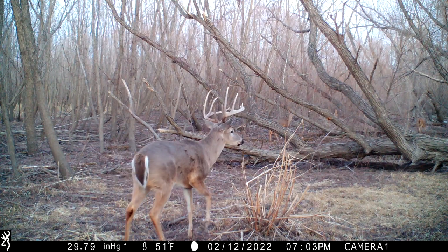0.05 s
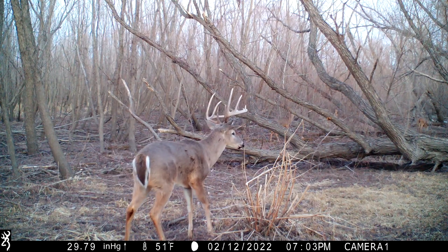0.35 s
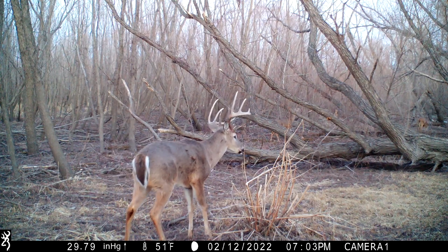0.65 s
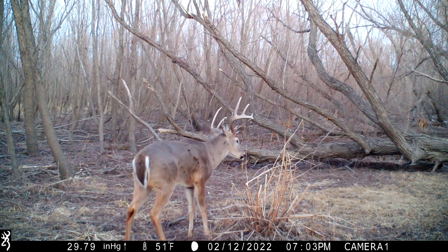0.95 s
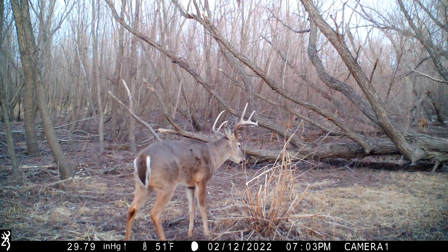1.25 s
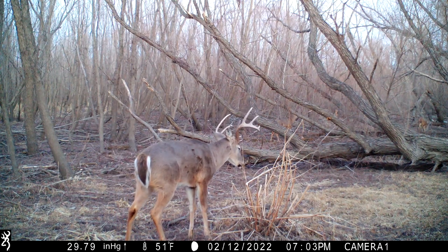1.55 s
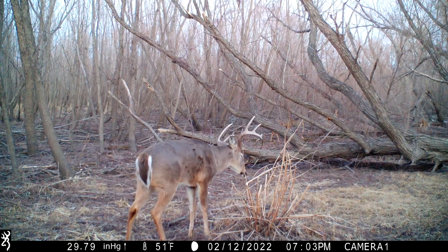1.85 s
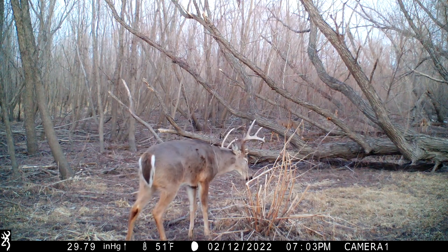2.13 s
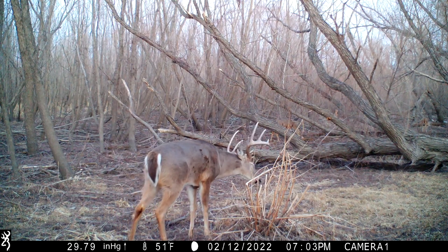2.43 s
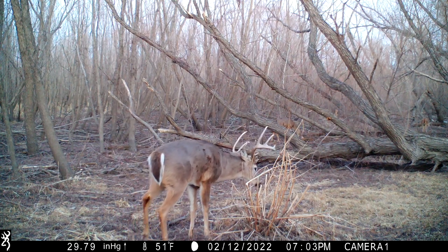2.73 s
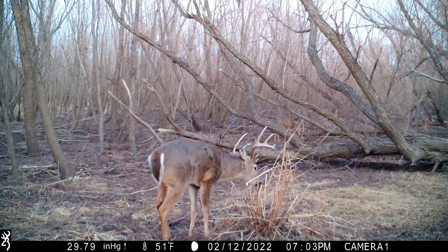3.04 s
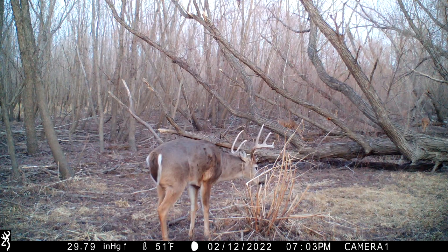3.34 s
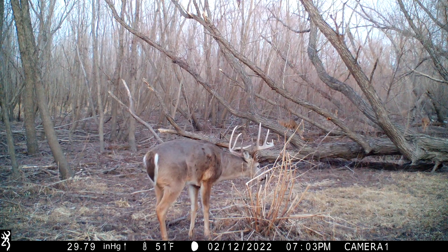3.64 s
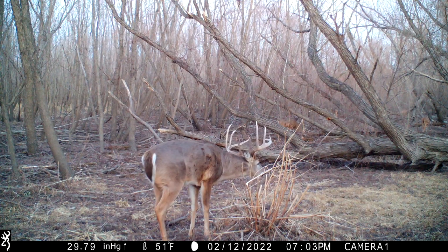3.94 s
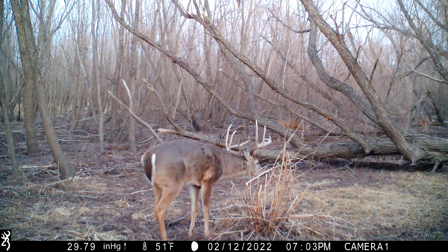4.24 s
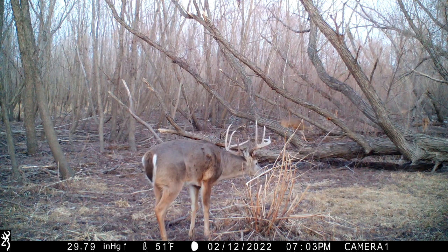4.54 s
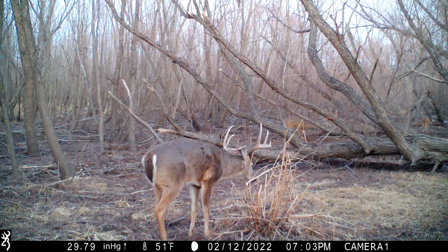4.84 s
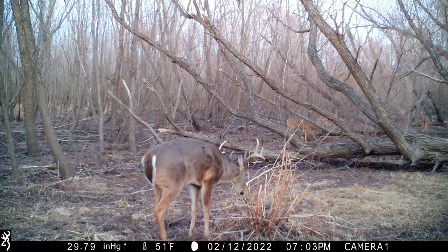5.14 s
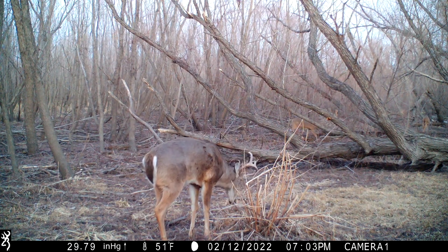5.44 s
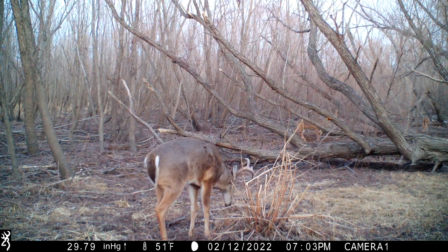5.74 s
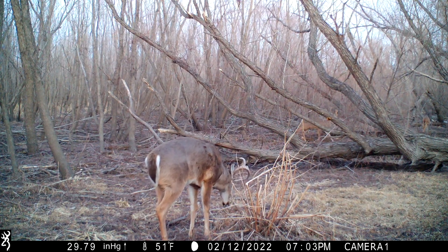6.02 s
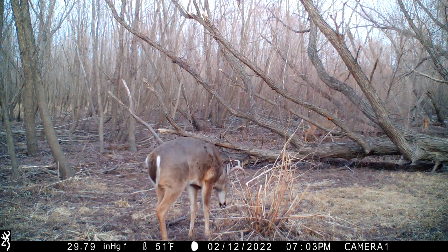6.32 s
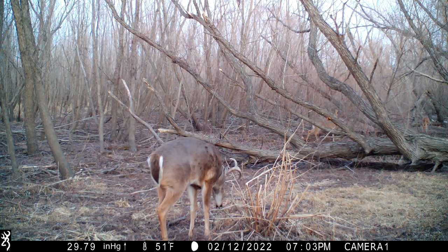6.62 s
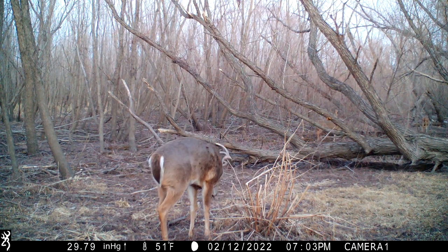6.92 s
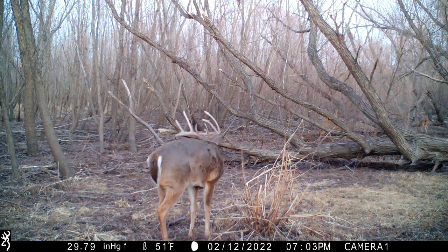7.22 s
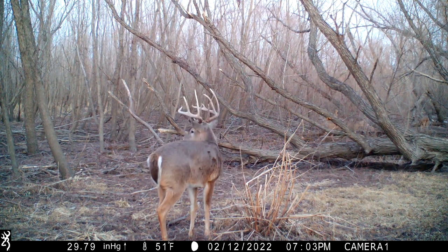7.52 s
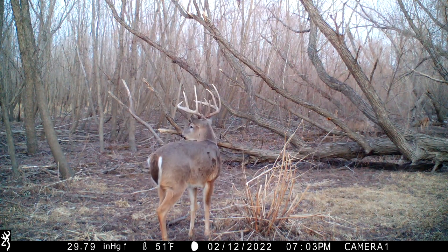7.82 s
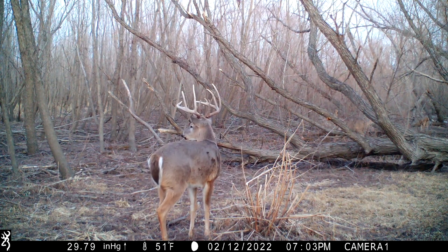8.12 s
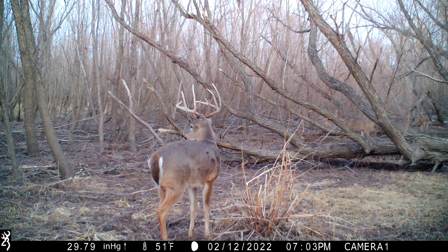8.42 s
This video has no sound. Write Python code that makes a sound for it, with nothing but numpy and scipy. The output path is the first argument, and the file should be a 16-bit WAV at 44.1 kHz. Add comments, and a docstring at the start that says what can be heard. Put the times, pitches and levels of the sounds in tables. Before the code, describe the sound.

A large flock of geese yelps and honks continuously beyond the trees while a nearby deer cracks twigs and brushes dry grass.

```python
"""Geese behind a bare wood

A trail camera's microphone picks up a big flock yelping without pause beyond a strip of trees.
The nearest birds stand out as short arched calls; hundreds more merge into a din that the trunks
scatter. Close by, a deer cracks twigs and brushes dry grass. Underneath lie a faint far-off drone,
still air, microphone hiss and the thin whine of the camera's electronics."""
import sys
import numpy as np
from scipy import signal
from scipy.fft import rfft, irfft, next_fast_len
from scipy.io import wavfile
from scipy.ndimage import uniform_filter1d

SR = 44100
rng = np.random.default_rng(int(sys.argv[2]) if len(sys.argv) > 2 else 0)


def output_pcm(signal):
    """Save a mono or channel-first signal as 16-bit PCM at the path in sys.argv[1].

    Samples are clipped to [-1, 1] before scaling.
    """
    pcm = np.clip(np.atleast_2d(signal).T, -1, 1) * 32767
    wavfile.write(sys.argv[1], SR, np.round(pcm).astype(np.int16))


N = 382347
TIME = np.arange(N) / SR

# treble lost between single geese and the microphone: frequency_hz, gain_db
TREBLE_LOSS = [(4900, -2), (5700, -1), (6400, -15.5), (7500, -30.5)]
DULLING_DB_PER_S = 0.71  # the overtones of the farther birds fade steadily
ROUGH_JITTER = .016  # shake of a rough voice's membranes, as a share of the pitch


def undb(db):
    """Decibels to gain."""
    return 10 ** (np.asarray(db) / 20)


def unit(x):
    """Scale to rms 1."""
    return x / np.sqrt(np.mean(x ** 2) + 1e-20)


def colour(x, points):
    """Filter a sound by a curve of (frequency_hz, gain_db) points."""
    size = next_fast_len(len(x))
    bin_hz = np.arange(size // 2 + 1) * SR / size
    point_hz, point_db = np.transpose(points)
    gain = undb(np.interp(np.log(bin_hz + 1), np.log(point_hz), point_db))
    return irfft(rfft(x, size) * gain, size)[:len(x)]


def add(out, start_s, x):
    """Mix a sound in at a time, dropping what falls outside."""
    i = int(start_s * SR)
    a, b = max(i, 0), min(i + len(x), len(out))
    if b > a:
        out[a:b] += x[a - i:b - i]


def wobble(t, rate_hz):
    """Random values joined by straight lines."""
    knots = np.arange(int(t[-1] * rate_hz) + 2)
    return np.interp(t * rate_hz, knots, rng.standard_normal(len(knots)))


def woods(x, wet_db, t60_s):
    """Direct sound plus a fading shower of echoes from the trunks."""
    t = TIME[:SR]
    echoes = rng.standard_normal(SR) ** 3 * undb(-60 * t / t60_s) * (t > .004)
    wet = undb(wet_db) * signal.fftconvolve(x, echoes / np.linalg.norm(echoes))[:N]
    return (x + wet) / np.sqrt(1 + undb(wet_db) ** 2)


def syrinx(length_s, top_hz, fall, jitter, rise=0.0862, bend=1.495, rise_s=0.0226, attack_s=0.0026):
    """Phase and envelope of a goose's voice: the pitch leaps up as pressure builds, then sags."""
    t = TIME[:int((length_s + .008) * SR)]
    # rise, fall and jitter are shares of the pitch; a higher bend holds the top longer
    leap = rise * np.clip(1 - t / rise_s, 0, 1) ** 2
    sag = fall * np.clip((t - rise_s) / max(length_s - rise_s, .01), 0, 1.2) ** bend
    hz = top_hz * (1 - leap - sag) * (1 + jitter * wobble(t, 500))
    swell = np.clip(t / attack_s, 0, 1) * np.clip((t[-1] - t) / 0.017, 0, 1)
    flutter = undb(1.8 * wobble(t, 120))
    return 2 * np.pi * np.cumsum(hz) / SR, swell * flutter


def yelp(length_s, hz, level_db, bright_db, sag, rough, break_step=.015, flutter_db=2.1):
    """One call, deep or shrill by its pitch, turning hoarse as the pressure runs out."""
    # harmonics 1, 2, .. of each kind of goose with its throat wide open: level_db
    deep_voice = [-4, 0.5, 1, -13, -17, -30]
    shrill_voice = [-2.5, -8.5, -2, -18.5]
    deep = hz < 1200
    rise, bend = (.17, 2.4) if deep else (.07, 1.3)
    phase, swell = syrinx(length_s, hz, sag, ROUGH_JITTER * rough, rise, bend)
    t = TIME[:len(phase)]
    # somewhere past the middle the voice breaks to a slightly different pitch
    break_s = length_s * (1 + rng.random()) / 2
    step_hz = hz * break_step * rough * rng.standard_normal()
    phase = phase + 2 * np.pi * step_hz * np.maximum(t - break_s, 0)
    harmonics_db = np.array(deep_voice if deep else shrill_voice)
    k = np.arange(1, len(harmonics_db) + 1)
    # distance and a narrower throat dull the upper harmonics; branches make each one flutter
    dulled = np.clip(k - 2 if deep else (k - 1) / 2, 0, 1)
    flutter = np.array([flutter_db * wobble(t, 110) for _ in k])
    gains = undb((harmonics_db + dulled * bright_db)[:, None] + flutter)
    hoarse = 1 + rough * (.5 + t / length_s) * wobble(t, 700)
    return undb(level_db) * swell * hoarse * np.sum(gains * np.sin(np.outer(k, phase)), axis=0)


def near_geese(gain_db=4.0, overtone_db=1.0, echo_db=-17):
    """Birds near the microphone, each call heard on its own and thrown back by two nearby trunks."""
    # calls that stand out of the chorus:
    # start_s, length_s, top_pitch_hz, relative_level_db, brightness_db, sag_share, roughness_0_to_1
    yelps = [(0.0, 0.034, 1564, -45, -11, 0.034, 0.3), (0.062, 0.065, 1396, -52, -8, 0.075, .4),
             (0.077, 0.057, 1486, -41, -12.5, 0.053, 0.83), (0.3, 0.065, 1540, -52, -5.5, 0.049, 1),
             (0.412, 0.11, 1514, -47, -8.5, 0.13, 0.63), (0.565, 0.066, 1566, -43, -13, 0.13, 0.65),
             (0.677, 0.11, 1492, -54.5, -6, 0.046, 0.36), (0.93, 0.038, 1516, -38.5, -24, 0.053, 0.04),
             (1.042, 0.065, 1570, -40.5, -36, 0.052, 0.85), (1.256, 0.072, 1497, -40.5, -27, 0.099, 0.97),
             (1.47, 0.094, 1440, -53, -2.5, 0.053, 0.5), (1.579, 0.018, 1334, -33.5, -29, 0.022, 0.05),
             (1.63, 0.062, 1570, -58, -1, 0.081, 0.1), (1.673, 0.069, 1075, -51.5, -24, 0.066, 0.5),
             (1.677, 0.055, 1434, -43.5, -13.5, 0.058, 0.34), (1.788, 0.09, 1540, -56, -4.5, 0.063, 0.3),
             (1.808, 0.05, 1105, -48.5, -24, .04, 0.45), (1.868, .045, 1517, -43.5, -20, 0.069, 0.9),
             (2.007, 0.054, 1455, -54, -7, .08, .3), (2.014, 0.083, 1670, -42.5, -27, 0.07, 0.97),
             (2.17, .11, 1365, -43, -12, 0.038, 0.55), (2.32, 0.049, 1320, -54, -5, .03, .3),
             (2.366, 0.043, 1525, -41, -18, 0.04, .4), (2.479, 0.082, 1560, -40.5, -21, 0.13, 0.15),
             (2.606, 0.1, 1623, -50.5, -6.5, 0.18, 0.15), (2.608, .05, 1490, -54, -6, 0.069, 0.2),
             (2.751, 0.06, 1547, -50.5, -7, 0.035, 0.4), (2.887, 0.068, 1404, -51.5, -7, 0.075, 0.6),
             (3.02, 0.077, 1446, -53, -11, 0.096, .4), (3.091, 0.04, 1700, -42, -36, 0.18, 0.9),
             (3.201, 0.07, 1003, -53, -24, 0.065, .6), (3.315, 0.055, 1310, -59, -8, 0.03, .3),
             (3.978, 0.056, 1536, -36.5, -26, 0.11, 0.25), (4.103, 0.036, 1565, -40, -28, 0.12, 0.65),
             (4.286, 0.064, 1480, -41.5, -17.5, 0.091, 0.4), (4.432, .07, 1357, -51.5, -9, .05, .6),
             (4.436, 0.091, 1515, -44, -19.5, 0.048, 0.63), (4.528, 0.044, 1589, -41, -22, 0.019, 0.45),
             (4.542, 0.12, 1587, -54, -2, 0.068, 0.1), (4.791, 0.074, 1580, -53.5, -5, .08, 0.2),
             (4.95, 0.031, 1363, -53, -4.5, .02, .2), (4.991, 0.047, 1465, -53.5, -7, 0.025, 0.2),
             (5.152, 0.05, 1490, -49, -27, 0.055, 0.2), (5.226, 0.075, 1045, -50.5, -13, 0.06, 0.1),
             (5.314, 0.06, 1033, -50, -21, 0.068, .15), (5.541, 0.052, 1460, -56, -8, 0.029, 0.15),
             (5.643, 0.039, 998, -45.5, -30, 0.05, 0.16), (5.696, 0.052, 1470, -51, -13, 0.049, 0.25),
             (5.783, .055, 1548, -54, -7, 0.07, 0.15), (5.858, .05, 1458, -54, -8, 0.05, 0.15),
             (6.237, 0.057, 1450, -41, -31, 0.035, 0.2), (6.404, 0.058, 1740, -45, -40, 0.074, 0.7),
             (6.49, 0.06, 1335, -55.5, -10, 0.018, 0.2), (6.578, 0.065, 1498, -46, -27, 0.044, 0.4),
             (6.927, 0.047, 1434, -39.5, -31, 0.034, 0.4), (7.044, 0.055, 1606, -41, -36, 0.093, 0.33),
             (7.181, 0.098, 1570, -44.5, -33, 0.15, 0.4), (7.298, 0.036, 1420, -44.5, -25, 0.055, .4),
             (7.405, .05, 1437, -56, -14, .06, 0.4), (7.474, 0.044, 978, -49, -29, .02, 0.4),
             (7.527, 0.098, 1035, -53, -26, 0.18, 0.8), (7.675, 0.052, 1071, -48.5, -22, 0.04, 0.2),
             (7.882, 0.1, 1350, -48, -27, 0.028, 0.15), (7.974, 0.075, 1455, -50, -24, 0.05, 0.15),
             (8.113, .075, 1551, -40.5, -28.5, 0.033, 0), (8.19, 0.075, 1512, -45, -27, 0.036, .15),
             (8.255, 0.08, 1680, -44, -37, 0.11, 0.2), (8.379, 0.055, 1590, -43, -27, 0.055, .2),
             (8.458, 0.063, 1020, -52, -29, 0.11, 0.2), (8.565, 0.053, 1590, -50, -41, 0.027, 0.4),
             (8.62, 0.037, 1036, -54, -18, 0.054, 0.5)]
    out = np.zeros(N)
    for start, length, hz, db, bright_db, sag, rough in yelps:
        call = yelp(length, hz, db, bright_db + overtone_db, sag, rough)
        add(out, start, call)
        for detour in rng.random(size=2):
            add(out, start + .045 * (0.18 + detour), undb(echo_db) * call)
    return undb(gain_db) * woods(colour(out, TREBLE_LOSS), wet_db=-15.0, t60_s=0.54)


def excitement_db(t, usual_db=-43):
    """How far the flock is above its usual level at these times."""
    # the flock's excitement: time_s, relative_level_db
    excitement = [(0.0, -43), (0.14, -41), (0.19, -40.5), (0.88, -42), (1.1, -40), (1.48, -43), (2.42, -39),
                  (2.78, -44), (2.94, -39.5), (3.97, -46), (4.0, -53.5), (4.07, -43), (4.58, -40),
                  (4.88, -44.5), (5.05, -40.5), (5.34, -45), (5.84, -40), (6.23, -49), (6.25, -53),
                  (6.3, -44), (7.11, -43), (7.83, -50.5), (8.09, -48.5), (8.12, -45.5), (8.58, -44.5),
                  (8.6, -48.5)]
    return np.interp(t, *np.transpose(excitement)) - usual_db


def answering(pitch_hz, level_db, bright_db, count, spread=0.061, scatter_db=0.5):
    """Birds take loose turns, louder when the flock is excited and duller as time goes on."""
    out = np.zeros(N)
    for turn, (late, detune, push, span) in enumerate(rng.standard_normal((count, 4))):
        start = (turn + .3 * late) / count * N / SR
        length_s = 0.055 * np.exp(.25 * span)
        hz = pitch_hz * np.exp(spread * detune)
        db = level_db + excitement_db(start) + scatter_db * push
        add(out, start, yelp(length_s, hz, db, bright_db - DULLING_DB_PER_S * start, sag=.09, rough=.4))
    return out


def flock_edge():
    """Geese at middle distance, just close enough to be told apart among the echoes of the wood."""
    shrill = answering(pitch_hz=1445, level_db=-52, bright_db=-10.5, count=48)
    deep = answering(pitch_hz=1039, level_db=-52, bright_db=-15, count=22)
    return woods(colour(shrill + deep, TREBLE_LOSS), wet_db=-7, t60_s=0.69)


def crowd(pitch_hz, spread, harmonics_db, count, depth_db=14, purity_db=7):
    """An even din: many birds of like size calling at random from different distances."""
    # colour of the massed voices on the microphone's side of the wood: frequency_hz, gain_db
    flock_colour = [(500, -29), (730, -13.5), (900, -1.5), (1150, 0), (1350, 5), (1700, -1), (2000, 0),
                    (2350, -7), (2900, -10.5), (3500, -20.5), (4500, -9), (5100, -13.5), (5700, -17.5),
                    (6800, -21.5)]
    out = np.zeros(N)
    k = np.arange(1, len(harmonics_db) + 1, dtype=np.float32)
    for when, span, droop, distance, detune in zip(*rng.random((4, count)), rng.standard_normal(count)):
        hz = pitch_hz * np.exp(spread * detune)
        phase, swell = syrinx(.045 + .05 * span, hz, fall=0.0289 + 0.1258 * droop, jitter=.016)
        # the higher a bird calls, the purer its voice
        gains = undb(harmonics_db) * undb(-purity_db * max(detune, 0) * (k > 2))
        voice = gains @ np.sin(np.outer(k, phase.astype(np.float32)))
        nearness = undb(-depth_db * np.sqrt(distance))  # few birds are close, most are far
        add(out, when * (N / SR + .1) - .1, nearness * swell * voice)
    din = colour(woods(out, wet_db=-6.0, t60_s=0.85), flock_colour)
    running_rms = np.sqrt(uniform_filter1d(din ** 2, SR // 10) + 1e-12)
    return din / running_rms


def flock(deep_db=-47.5, shrill_db=-45.0, overtone_db=2.5):
    """Beyond the trees the voices swell in waves, the shrill ones most; their overtones slowly fade."""
    excited_db = excitement_db(TIME)
    deep = crowd(pitch_hz=976.6, spread=.1, harmonics_db=[-5, -6.0, -5.5, -4.5, -29.0], count=620)
    shrill = crowd(pitch_hz=1449.0, spread=.11, harmonics_db=[0.0, -6, -8.5, -10.0], count=800)
    din = deep * undb(deep_db + excited_db) + shrill * undb(shrill_db + 1.22 * excited_db)
    # twigs and trunks scatter the short waves most, so the overtones arrive as a wash
    overtones = colour(din, [(1800, -40), (2300, -7), (2800, 0)])
    wash = woods(overtones, wet_db=-5, t60_s=.45)
    return din - overtones + wash * undb(overtone_db - DULLING_DB_PER_S * TIME)


def drone():
    """A low murky drone that swells far away and fades."""
    # its swells at the microphone: time_s, level_db
    swells = [(0, -68.5), (.8, -70), (1.25, -62.5), (1.7, -71), (2.2, -62.5), (2.7, -76.5), (3.2, -66.5),
              (4, -81.5), (8.67, -90)]
    # its two spectral humps: frequency_hz, gain_db
    humps = [(200, -18.5), (295, 15), (390, -12), (490, 5.5), (590, 13), (720, -11.5), (900, -35)]
    level_db = np.interp(TIME, *np.transpose(swells))
    return undb(level_db) * unit(colour(rng.standard_normal(N), humps))


def air(level_db=-52.5):
    """The soft, steady noise of the open air, thinning into microphone hiss."""
    # still air and hiss: frequency_hz, gain_db
    air_colour = [(25, -15.5), (60, -13.5), (130, -7), (290, -4.5), (450, -2), (650, -1), (1200, 5),
                  (3000, -7.5), (6000, -33.5), (9500, -38.5), (15000, -38.5)]
    return undb(level_db) * unit(colour(rng.standard_normal(N), air_colour))


def camera_whine(pitch_hz=7788.5, frame_hz=59.45, level_db=-75.5):
    """A thin electronic tone whose sign flips at every sensor frame."""
    flip = (-1.) ** np.floor(TIME * frame_hz)
    tone = flip * np.sin(2 * np.pi * pitch_hz * TIME)
    return undb(level_db) * unit(colour(tone, [(5500, 9.5), (7800, 9.5), (10500, -13.0)]))


def twig_ring(t, detune=0.025):
    """The short woody ring of one twig; each is tuned a little differently."""
    # modes of a breaking twig: frequency_hz, level_db, t60_s
    modes = [(2850, -5, 0.028), (3680, -11, 0.02), (5455, -10, 0.02)]
    tuning = 1 + detune * rng.standard_normal()
    return sum(undb(db - 60 * t / t60) * np.sin(2 * np.pi * hz * tuning * t) for hz, db, t60 in modes)


def deer(tear_db=-4.0, crack_db=-20, ring_db=-5, hard_snap_db=-39, crack_t60_s=0.0093):
    """Close to the microphone twigs crack, tear and ring; brushed grass is a swarm of tiny snaps."""
    # twigs breaking under the deer: start_s, force_db, tearing_s
    twigs = [(0.9077, -46, 0.00305), (1.3174, -50, 0.0044), (1.3616, -40.5, .003), (1.955, -35.5, 0.0044),
             (2.452, -44, 0.0018), (2.5556, -39, 0.0063), (2.5664, -38.5, 0.0036), (2.7037, -41.5, 0.0036),
             (3.177, -48, 0.0039), (3.484, -42, 0.00275), (5.091, -45, .004), (5.1696, -50, 0.0034),
             (5.1904, -42, 0.0048), (6.84, -44, .004), (6.8485, -48, 0.0031), (6.856, -47, 0.0031),
             (6.9076, -43.5, 0.0056), (6.9451, -49, 0.0044), (6.9626, -44, .002), (7.025, -47, 0.0055),
             (7.052, -38, 0.0042), (7.062, -51, 0.0054)]
    # dry grass and leaves it brushes: start_s, length_s, relative_level_db
    rustles = [(0.242, 0.42, -60), (1.27, 0.14, -60), (6.841, 0.044, -59), (6.898, .035, -61),
               (6.965, 0.032, -54), (6.998, 0.085, -56)]
    # woody colour of dry stems: frequency_hz, gain_db
    stem_colour = [(1200, -19.5), (2700, -1), (3600, -3.5), (4300, -7), (5150, -3.5), (5600, -1.5),
                   (5950, -14.5), (6500, -17), (7500, -29.5), (10000, -34), (14000, -42)]
    # colour of the instant of breaking: frequency_hz, gain_db
    crack_colour = [(1200, -20), (2500, 27), (5200, 19), (7500, -1), (10000, -1.5), (14500, -14)]
    stems, cracks, rings = np.zeros((3, N))
    t = TIME[:SR // 20]
    for start, db, tear_s in twigs:
        fibres = np.exp(-(2 * t / tear_s - 1) ** 2)
        add(stems, start, undb(db + tear_db) * fibres * rng.standard_normal(len(t)))
        excess_db = db - hard_snap_db  # thick twigs break harder and ring more
        crack_decay = undb(db + crack_db + .4 * excess_db - 60 * t / crack_t60_s)
        add(cracks, start, crack_decay * rng.standard_normal(len(t)))
        add(rings, start + tear_s / 2, undb(db + ring_db + .5 * excess_db) * twig_ring(t))
    for start, length, db in rustles:
        size = int(length * SR)
        snaps = unit(rng.standard_normal(size) ** 3 * signal.windows.tukey(size))
        add(stems, start, undb(db) * snaps)
    return undb(9.5) * colour(stems, stem_colour) + colour(cracks, crack_colour) + rings


def close_call(curve, harmonics_db, split_rad=.7, flutter_db=2.2):
    """A bird calling hard: as its voice breaks, the membranes shake and repeat every third swing."""
    times, *columns = np.transpose(curve)
    length_s = times[-1] - times[0]
    t = TIME[:int(length_s * SR)]
    hz, db, tilt, broken = (np.interp(times[0] + t, times, column) for column in columns)
    shake = 1 + ROUGH_JITTER * (.2 + broken) * wobble(t, 600)
    phase = 2 * np.pi * np.cumsum(hz * shake) / SR
    phase = phase + split_rad * broken * np.sin(phase / 3)
    k = np.arange(1, len(harmonics_db) + 1)[:, None]
    # each harmonic flutters on its own way through the branches
    flutter = np.array([flutter_db * wobble(t, 220) for _ in harmonics_db])
    gains = undb(np.array(harmonics_db)[:, None] + db + tilt * (k - 2) + flutter)
    swell = np.clip(np.minimum(t, length_s - t) / .005, 0, 1)
    return swell * np.sum(gains * np.sin(k * phase), axis=0)


def closest_geese():
    """Closest of the flock: one long shrill cry and two breaking honks, each trailed by its echoes."""
    # course of each call: time_s, pitch_hz, level_db, tilt_db_per_harmonic, voice_break_0_to_1
    long_cry = [(.79, 1520, -47, -8, 0), (.818, 1650, -44, -6, 0.1), (.86, 1590, -50, 1, 0.06),
                (.897, 1558, -46.5, 2, 0.1), (.935, 1473, -53.5, 3, 0), (.95, 1520, -58, 4, .2),
                (.975, 1445, -59, 5, 0.4), (1.02, 1350, -64, 2, .5)]
    first_honk = [(4.031, 955, -47, 0, .1), (4.05, 1120, -44, .3, .05), (4.068, 1120, -44.5, .3, .15),
                  (4.082, 1112, -46, 1.2, 1), (4.091, 1075, -43, -1.5, .25), (4.108, 955, -40.5, -2.2, .05),
                  (4.123, 975, -41, -5, .3)]
    second_honk = [(4.212, 975, -43, -2, .4), (4.226, 1062, -38, -1.3, .2), (4.241, 1100, -38.5, -1.5, .1),
                   (4.262, 1075, -42, -2, .35), (4.273, 1055, -40, -3, .1), (4.284, 1015, -43, -3.5, .3),
                   (4.301, 970, -43, -2.5, .15)]
    # harmonics 1, 2, .. of the cry and of the honks: level_db
    cry_voice = [-2.5, -7.5, -0.5, -24.5]
    honk_voice = [-8, .5, -5.5, -16.5, -20, -40]
    # echoes off bare trunks: delay_s, gain_db
    trunks = [(.024, -20), (.047, -14)]
    out = np.zeros(N)
    for curve, voice in [(long_cry, cry_voice), (first_honk, honk_voice), (second_honk, honk_voice)]:
        start = curve[0][0]
        call = close_call(curve, voice)
        add(out, start, call)
        for delay, db in trunks:
            add(out, start + delay, undb(db) * call)
    return woods(out, wet_db=-11, t60_s=.6)


def scene():
    """The wood from the camera's one microphone, with the geese listed from near to far."""
    geese = closest_geese() + near_geese() + flock_edge() + flock()
    return (geese + deer() + drone() + air() + camera_whine())[None]


def record(dry):
    """The camera cuts the top treble steeply."""
    top_hz = 15660
    return signal.sosfilt(signal.ellip(10, .1, 70, top_hz, fs=SR, output="sos"), dry)


dry = scene()
out = record(dry)
output_pcm(out)
```